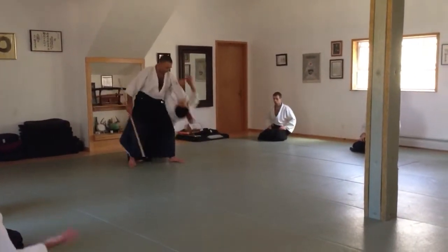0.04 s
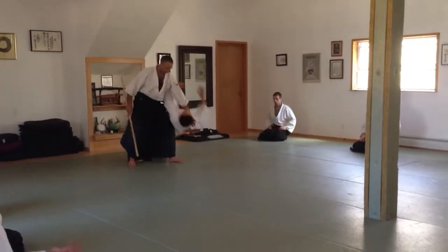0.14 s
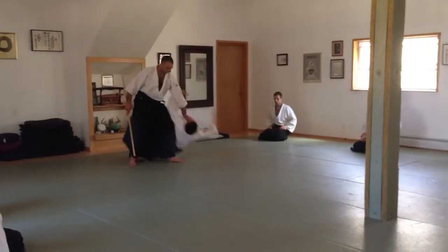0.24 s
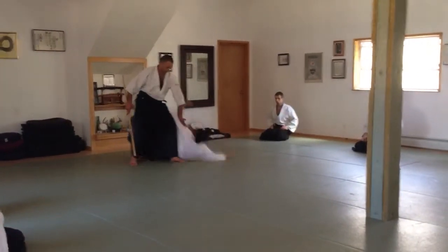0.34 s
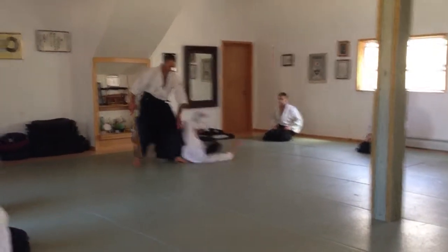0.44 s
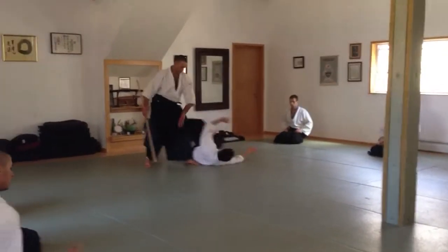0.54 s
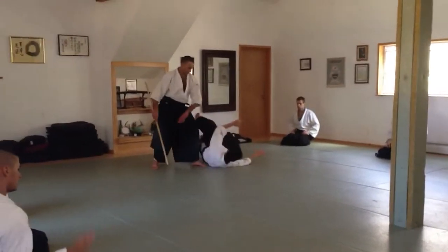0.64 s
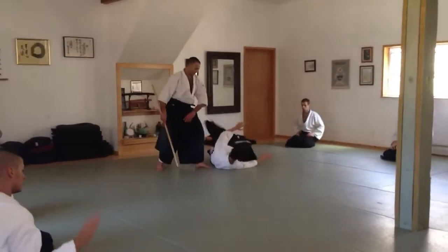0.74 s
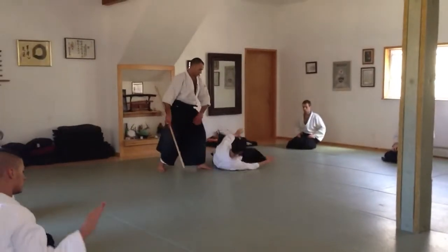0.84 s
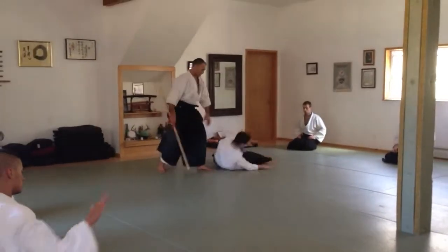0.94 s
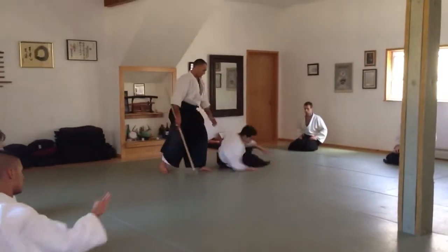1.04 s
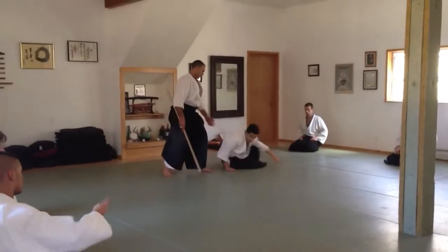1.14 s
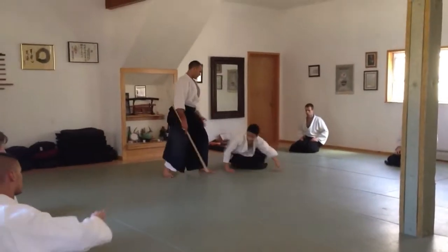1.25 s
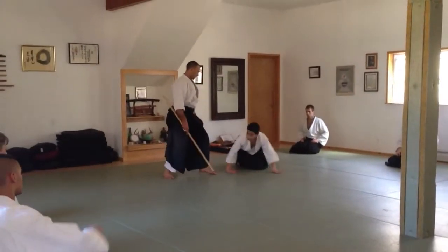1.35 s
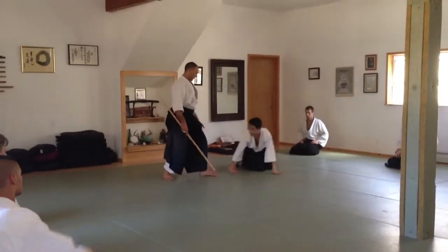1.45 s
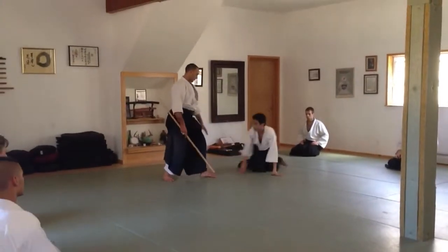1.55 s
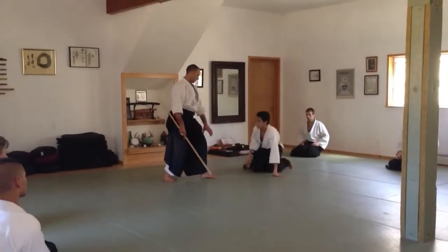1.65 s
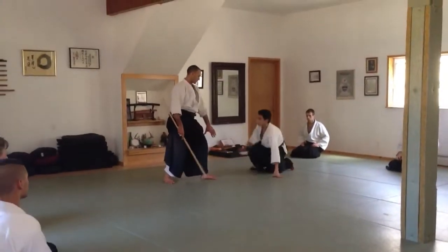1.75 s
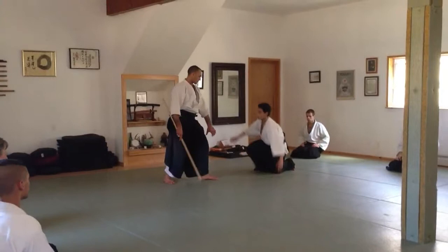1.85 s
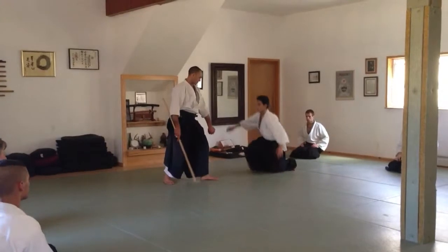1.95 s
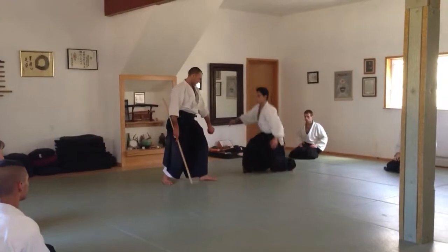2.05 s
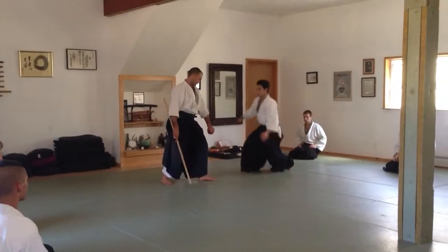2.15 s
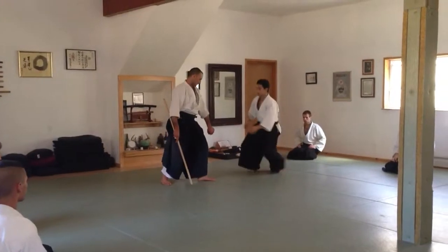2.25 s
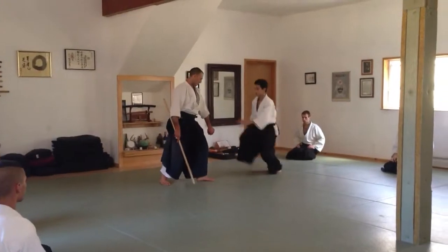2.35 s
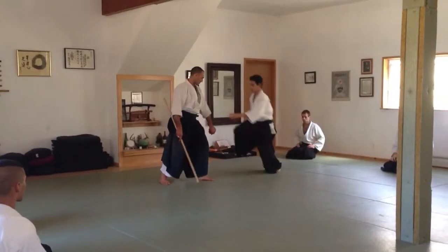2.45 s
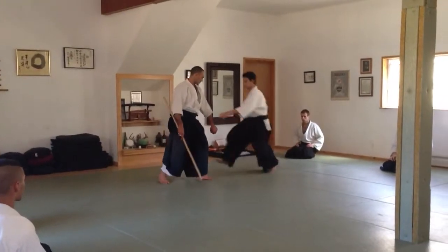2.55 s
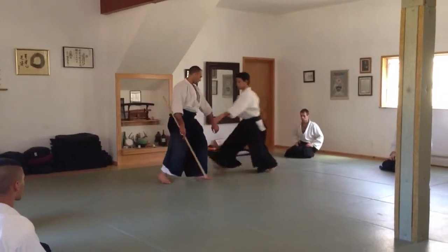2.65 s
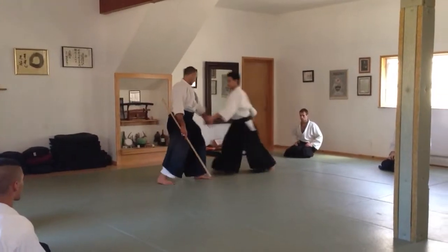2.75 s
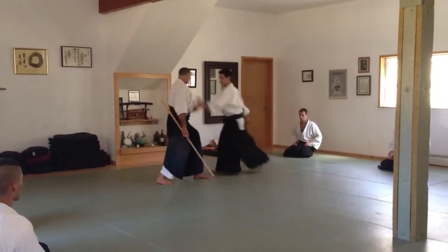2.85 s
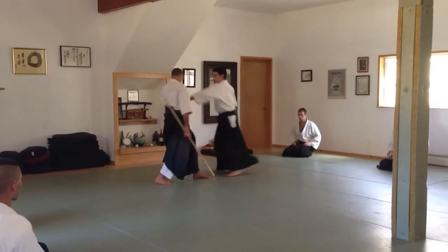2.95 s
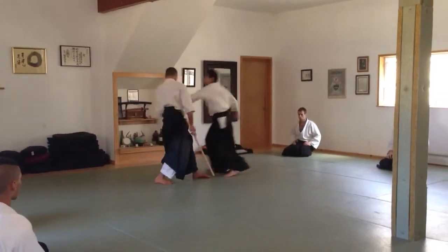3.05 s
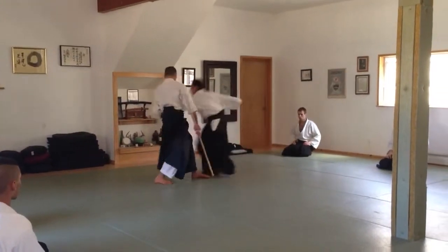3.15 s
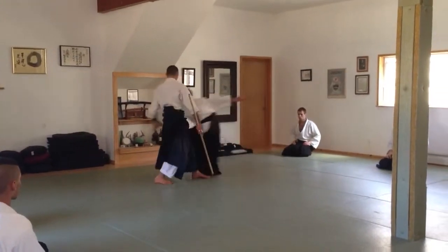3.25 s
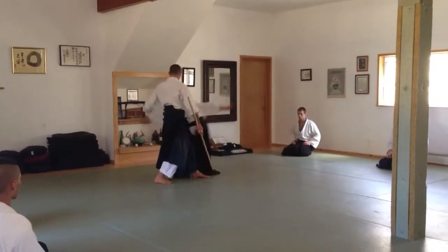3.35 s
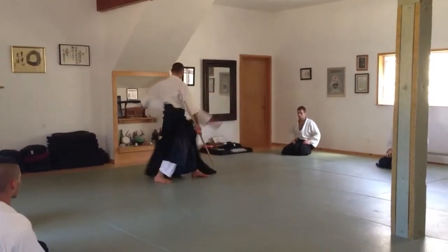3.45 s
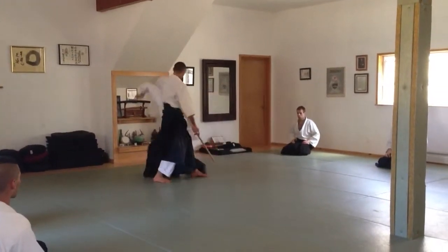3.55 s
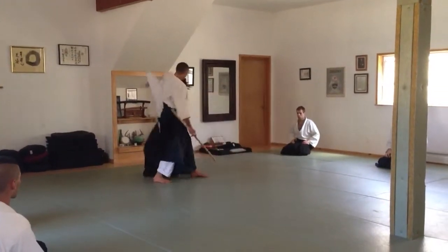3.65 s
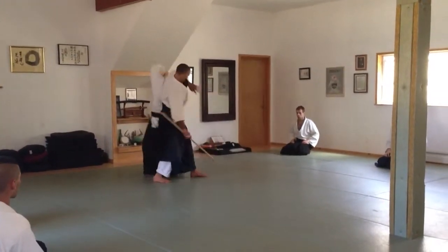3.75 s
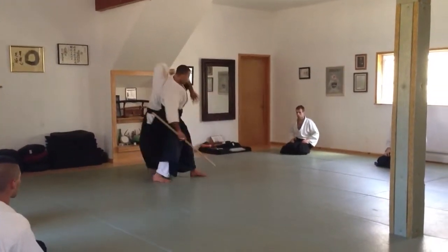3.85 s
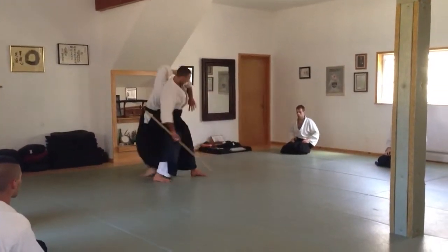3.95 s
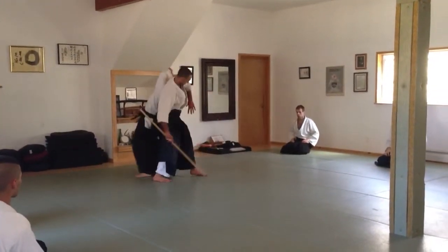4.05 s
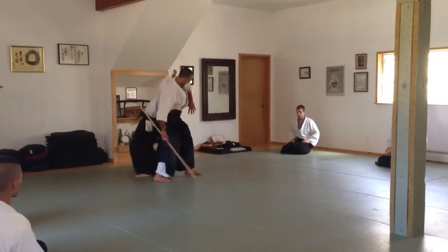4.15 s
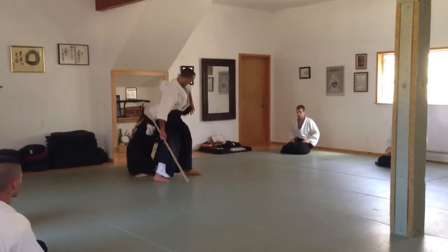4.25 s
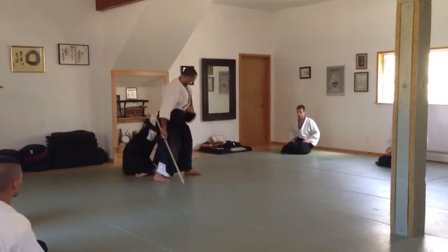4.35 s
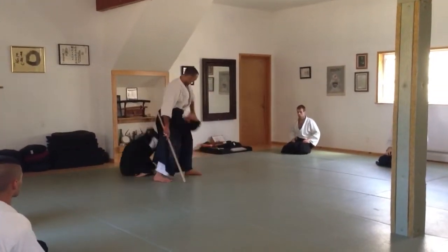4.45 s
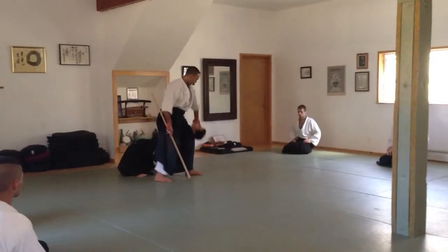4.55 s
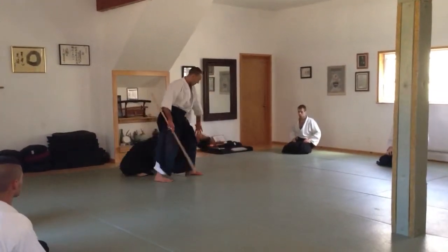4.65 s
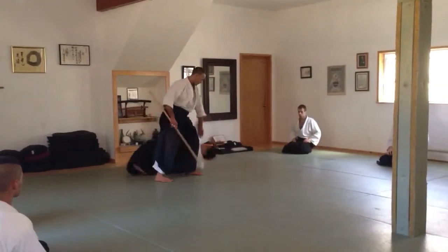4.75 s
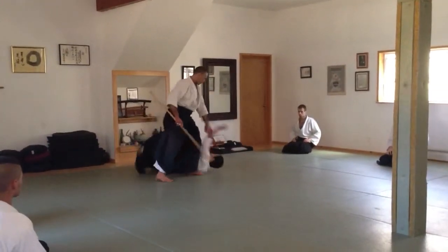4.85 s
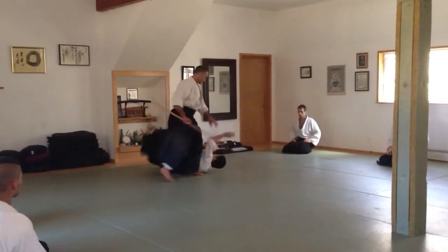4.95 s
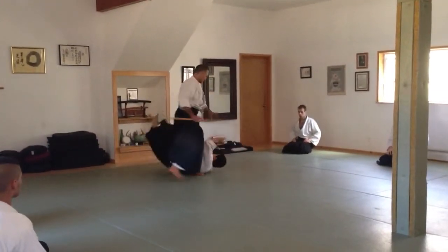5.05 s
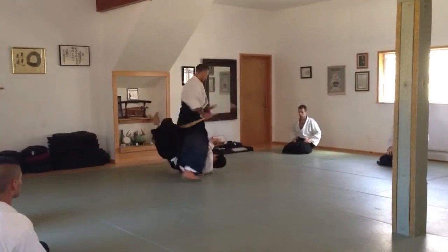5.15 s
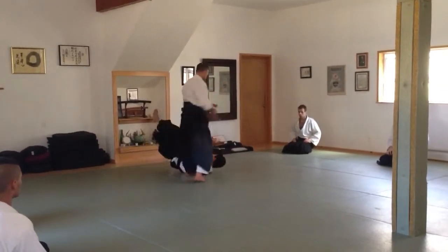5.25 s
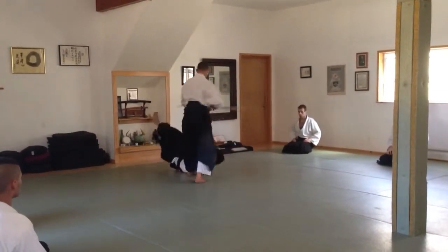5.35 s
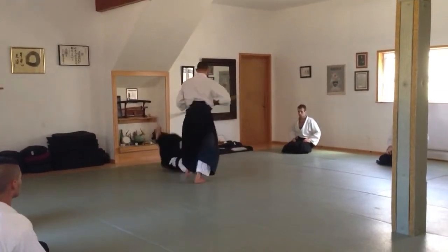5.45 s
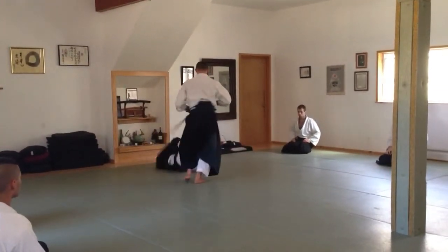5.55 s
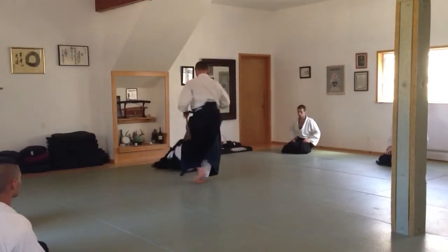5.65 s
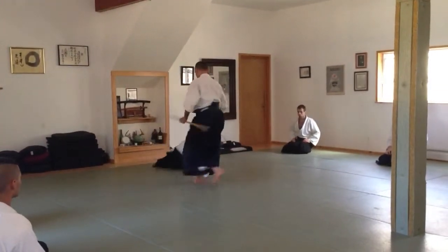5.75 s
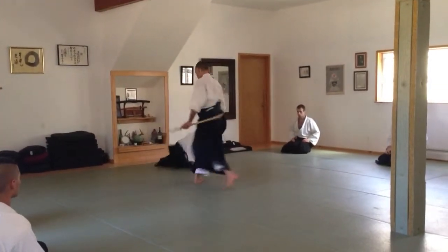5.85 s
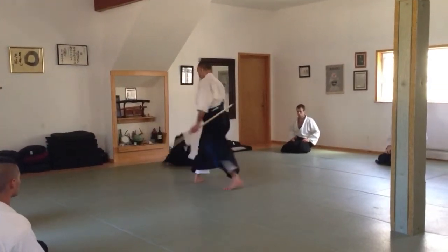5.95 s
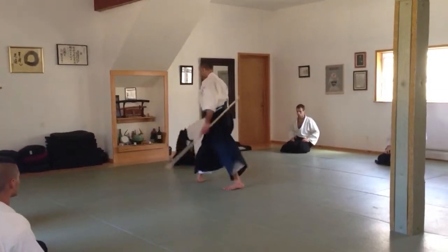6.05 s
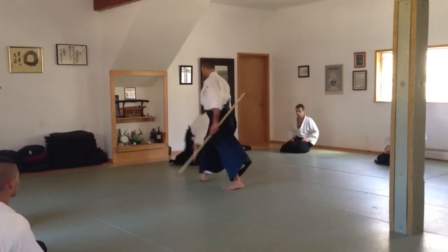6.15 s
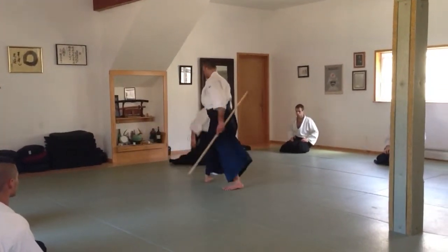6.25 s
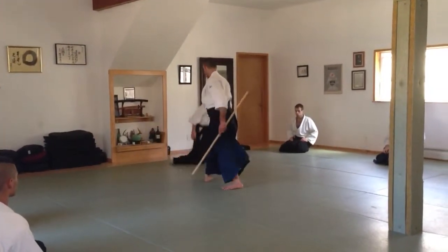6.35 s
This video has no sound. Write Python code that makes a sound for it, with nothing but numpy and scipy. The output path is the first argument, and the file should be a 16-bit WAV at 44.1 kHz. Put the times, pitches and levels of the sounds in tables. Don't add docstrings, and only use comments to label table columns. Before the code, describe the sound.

A bare, lively room heard from across the floor, with faint hiss and a low wavering motor hum throughout. Light barefoot scuffs at 0.1 s, then from about 0.42 to 0.6 s a body crashes onto the mat: tightly overlapping hollow booms, foam knocks and cracking slaps, the loudest event, with an echoing tail over half a second long. Around 1.15 to 1.3 s skin peels with tiny squeaks and a sole twists briefly. Soft pads and cotton rustles continue from 1.7 to 3.3 s. At 3.44 s a lighter fall lands with a bright rasping foot twist, and a wooden staff knocks several times until 3.75 s. Sliding scuffs follow at 3.8 and 4.06 s, with a firmer step at 4.3 s. A third hard fall hits at 4.84 s, thumping until about 5.07 s, and its tail fades. Quiet turning soles, cloth and soft steps run from 5.5 s to the end near 6.4 s.

```python
import sys
import numpy as np
from scipy import signal
from scipy.fft import rfft, irfft
from scipy.io import wavfile
from scipy.ndimage import uniform_filter1d

SR = 44100
rng = np.random.default_rng(int(sys.argv[2]) if len(sys.argv) > 2 else 0)


def ratio(d):
    e = np.asarray(d, float) / 20
    return 10 ** e


def to_wav(s):
    ch = np.atleast_2d(s).T
    pcm = np.round(np.clip(ch, -1, 1) * 32767)
    wavfile.write(sys.argv[1], SR, pcm.astype(np.int16))


N = 281799


def band(x, hz, width_hz, order=1):
    low_hz = np.sqrt(hz ** 2 + width_hz ** 2 / 4) - width_hz / 2
    high_hz = min(low_hz + width_hz, 0.48 * SR)
    sos = signal.butter(order, [low_hz, high_hz], "band", fs=SR, output="sos")
    return signal.sosfilt(sos, x)


def unit(x):
    return x / np.sqrt(np.mean(x ** 2))


def read(table, hz):
    table_hz, values = np.transpose(table)
    return np.interp(np.log(np.maximum(hz, 1)), np.log(table_hz), values)


def colour(x, table):
    gain_db = read(table, np.fft.rfftfreq(len(x), 1 / SR))
    return irfft(rfft(x) * ratio(gain_db), len(x))


def walk(rate_hz):
    k = int(SR / rate_hz)
    return unit(uniform_filter1d(uniform_filter1d(rng.standard_normal(N), k), k))


def lag(x, seconds):
    keep = np.exp(-1 / (seconds * SR))
    return signal.lfilter([1 - keep], [1, -keep], x)


# start in seconds, boom in dB, boom in Hz, knock in dB, slap in dB.
TRUNK = [(.417, -44, 310, -29.5, -59), (.427, -30.5, 200, -44, -42), (.462, -7, 335, -18, -21.5),
         (.470, -4.5, 223, -14, -16.5), (.552, -6, 230, -43, -57), (.584, -21, 220, -49, -37),
         (.65, -35, 302, -44, -42), (3.437, -22, 233, -25, -27.5), (3.449, -17.5, 208, -27, -17.5),
         (3.489, -18, 168, -34, -45), (3.525, -28, 213, -39, -56), (3.612, -35, 206, -59, -64),
         (4.828, -41.5, 298, -34, -42), (4.844, -3, 231, -11, -10.5), (4.853, -11, 267, -14.5, -28),
         (5.066, -19.5, 233, -38, -60)]
# start in seconds, boom in dB, boom in Hz, knock in dB, slap in dB.
LIMBS = [
    (.442, -25, 309.2, -19, -34.5),
    (.516, -23, 316, -22, -23.5),
    (.726, -51, 296, -58.5, -67),
    (3.44, -41, 230, -33, -47),
    (4.839, -14, 288, -12, -26.5),
    (4.946, -10.5, 214, -27.5, -32),
]
# start in seconds, boom in dB, boom in Hz, knock in dB, slap in dB.
HANDS = [
    (.4487, -23, 305, -28, -10.5),
    (.453, -3, 241, -13.5, -32),
    (.496, -8.5, 300, -24, -23.5),
    (3.455, -31, 225, -34.5, -45),
    (4.863, -6.5, 205, -15.5, -16),
    (4.894, -13, 180, -27, -21),
]


def landings():
    parts = [(TRUNK, 560), (LIMBS, 864), (HANDS, 1510)]
    rows = []
    for table, knock_hz in parts:
        for s, boom_db, boom_hz, knock_db, slap_db in table:
            rows.append((s, boom_db, boom_hz, knock_db, knock_hz, slap_db))
    return sorted(rows)


# start in seconds, boom in dB, boom in Hz, knock in dB, slap in dB.
STEPS = [(0.14, -54, 337, -56.5, -41), (1.256, -41, 189, -50, -40), (1.703, -53.5, 344, -67.5, -53),
         (2.34, -37.5, 172, -38.5, -58), (2.368, -40, 167, -50, -63), (2.418, -45, 261, -50.5, -73),
         (2.598, -40.5, 197, -46, -51), (2.629, -43, 295, -40, -58), (2.671, -41, 164, -73, -49),
         (2.791, -43, 355, -52, -48), (3.06, -49, 184, -45, -45), (3.098, -48, 219, -48.5, -67),
         (3.238, -40, 249, -47, -57), (3.278, -39, 158, -49, -67), (4.053, -53, 258, -66, -44.5),
         (4.141, -43.5, 184, -76, -56), (4.251, -46.5, 214, -53, -43.5), (4.305, -29, 181, -51, -42.5),
         (4.374, -37.5, 190, -49.5, -77), (4.64, -47, 192, -46.5, -56), (5.562, -48.5, 268, -56, -67),
         (5.81, -47, 206, -42.5, -48.5), (5.981, -45.5, 168.4, -55.5, -64), (6.332, -51.5, 224, -49, -44)]


def footfalls():
    knock_hz = 700
    return [(s, boom_db, boom_hz, knock_db, knock_hz, slap_db) for s, boom_db, boom_hz, knock_db, slap_db in STEPS]


# frequency in Hz, level in dB per Hz.
SLAP_SPECTRUM = [(800, -31.5), (1500, -2), (2300, -6.5), (2950, -1), (4100, -8.5), (6000, -12),
                 (9000, -16.5), (13000, -25), (16000, -51)]


def contacts(rows, boom_db, knock_db, slap_db, over, give, give_s, rise_s, ring_s, knock_s, slap_s):
    size = 4096
    out, t = np.zeros(N + size), np.arange(size) / SR
    for s, low_db, low_hz, mid_db, mid_hz, high_db in rows:
        noise = rng.standard_normal((2, size))
        boom = np.sin(2 * np.pi * low_hz * t) + over * np.sin(2 * np.pi * 1.3 * low_hz * t)
        boom *= (1 - np.exp(-t / rise_s)) * np.exp(-t / ring_s)
        boom += give * t / give_s * np.exp(1 - t / give_s)
        thump = unit(band(noise[0], mid_hz, 0.45 * mid_hz, order=2))
        knock = (1 - np.exp(-t / 0.0015)) * np.exp(-t / knock_s) * thump
        crack = unit(colour(noise[1], SLAP_SPECTRUM))
        slap = (1 - np.exp(-t / 0.00021)) * np.exp(-t / slap_s) * crack
        i = int(s * SR)
        out[i:i + size] += ratio(low_db + boom_db) * boom
        out[i:i + size] += ratio(mid_db + knock_db) * knock
        out[i:i + size] += ratio(high_db + slap_db) * slap
    return out[:N]


# start in seconds, peak in dB, frequency in Hz.
DROPS = [(0.467, -19.5, 101), (0.529, -48, 53.8), (0.739, -47, 96), (2.359, -40.5, 64.6),
         (2.719, -72, 80.7), (3.109, -45, 83.4), (3.456, -39, 92), (3.649, -53, 99), (4.139, -65.5, 88.8),
         (4.329, -46, 99.6), (4.868, -33, 102), (5.269, -78.5, 103)]


def joists():
    out, t = np.zeros(N), np.arange(N) / SR
    for s, db, hz in DROPS:
        age = np.maximum(t - s, 0)
        swing = age / 0.024 * np.exp(1 - age / 0.0096)
        out += ratio(db + 6) * swing * np.sin(2 * np.pi * hz * age)
    return out


def rings(rows):
    size = 8192
    out, t = np.zeros(N + size), np.arange(size) / SR
    for s, db, hz, length_s in rows:
        rough = unit(band(rng.standard_normal(size), hz, 0.09 * hz, order=2))
        envelope = (1 - np.exp(-t / 0.0018)) * np.exp(-t / length_s)
        i = int(s * SR)
        out[i:i + size] += ratio(db) * envelope * (np.sin(2 * np.pi * hz * t) + 0.34 * rough)
    return out[:N]


# start in seconds, level in dB, frequency in Hz, length in seconds.
STAFF = [
    (3.441, -37, 617, 0.027),
    (3.492, -31, 602, 0.025),
    (3.522, -32, 616, .025),
    (3.61, -34, 639, 0.015),
    (3.735, -45, 620, 0.0097),
]


def staff():
    return rings(STAFF)


# start in seconds, level in dB, frequency in Hz, length in seconds.
PEELS = [
    (1.158, -49, 2045, 0.0089),
    (1.256, -45.5, 4680, 0.0069),
]


def peels():
    return rings(PEELS)


def swell(t, s, rise_s, fall_s, db):
    return ratio(db - 16 * np.maximum((s - t) / rise_s, (t - s) / fall_s))


# time in seconds, level in dB.
EFFORT = [(0, -55.5), (.36, -58.5), (1.0, -74), (1.25, -64), (1.48, -68), (1.77, -60.5), (1.96, -72),
          (2.2, -61.5), (2.54, -67.5), (2.63, -57), (2.95, -63.5), (3.26, -58), (3.95, -65.5),
          (4.55, -60.5), (5.5, -66.5), (5.78, -59.5), (6.25, -73.5), (6.39, -50)]


def body_effort(t):
    return ratio(np.interp(t, *np.transpose(EFFORT)))


# peak in seconds, rise in seconds, fall in seconds, level in dB, brightness in dB.
SLIDES = [(.04, 0.016, 0.6, -69, 0.5), (.15, 0.022, 0.074, -62, 3), (0.191, 0.057, 0.095, -61.5, -7.5),
          (1.16, 0.051, 0.09, -66, 2.5), (1.52, .04, 0.083, -72, -1), (1.72, 0.18, 0.56, -72, 1),
          (2.34, 0.044, 0.16, -76, 10), (2.63, 0.071, 0.22, -68, -4), (2.81, 0.03, 0.052, -63, 1),
          (3.069, 0.021, 0.051, -53.5, 0), (3.26, 0.28, 0.21, -64, -3), (3.808, 0.12, 0.16, -55.5, -4),
          (4.063, 0.021, 0.11, -49.5, -3.5), (4.198, .02, 0.088, -68.5, -10.5),
          (4.304, 0.059, 0.21, -61, -1), (6.2, 0.11, 0.063, -74, 3.5), (6.314, 0.078, 0.053, -57.5, -2)]
# peak in seconds, rise in seconds, fall in seconds, level in dB, centre in Hz.
TWISTS = [
    (1.259, 0.064, 0.035, -49, 4660),
    (1.32, 0.025, 0.13, -66.5, 4910),
    (3.455, 0.011, 0.11, -39.5, 5600),
    (5.87, 0.053, 0.185, -61.5, 5520),
]


def sole_gains(t, effort):
    sole_db, sole_bright_db, twist_bright_db, slide_hz = -9.5, -4.5, -48, 4870
    slides = [(swell(t, s, rise, fall, db), bright_db) for s, rise, fall, db, bright_db in SLIDES]
    twists = [(swell(t, s, rise, fall, db), hz) for s, rise, fall, db, hz in TWISTS]
    free = ratio(sole_db) * effort + sum(g for g, _ in slides)
    held = sum(g for g, _ in twists)
    rub = free + held
    shine = ratio(sole_db + sole_bright_db) * effort
    shine = shine + sum(g * ratio(db) for g, db in slides) + ratio(twist_bright_db) * held
    centre_hz = (free * slide_hz + sum(g * hz for g, hz in twists)) / rub
    return rub, shine, centre_hz


def grains(rate_hz, spread_db):
    hits = rng.random(N) < rate_hz / SR
    sizes = ratio(spread_db * np.minimum(rng.exponential(size=N), 5))
    return unit(rng.standard_normal(N) * (0.76 + hits * sizes))


WEAVE_HZ = 3300 * 1.15 ** np.arange(7)


def soles(rub, shine, centre_hz):
    scrape = grains(4100, 2.2)
    peak = 0
    for hz in WEAVE_HZ:
        share = np.exp(-(np.log(centre_hz / hz) / 0.092) ** 2)
        peak = peak + share * band(scrape, hz, hz / 6)
    focus = np.clip(-20 * np.log10(shine / rub) / 14, 0.1, 1)
    broad = unit(band(scrape, 6000, 6000, order=2))
    scuff = 1.8 * focus * unit(peak) + (1.2 - 0.59 * focus) * broad
    bright = unit(band(scrape, 10500, 8000, order=2))
    return ratio(-4.5) * (rub * scuff + shine * bright)


def cotton(effort, rub):
    cloth_db, dragged_db = -4, -17
    rasp = unit(band(grains(3000, 4.1), 1300, 1400, order=2))
    return (ratio(cloth_db) * effort + ratio(dragged_db) * rub) * rasp


def boards(t, effort):
    board_db, stir_db, stir_s = -3.5, -9, 0.13
    planks = unit(band(rng.standard_normal(N), 240, 350, order=2))
    frame = unit(band(rng.standard_normal(N), 73, 80, order=2))
    shuffle = ratio(1.07 * walk(28)) * (planks + 0.25 * frame)
    stir = 0
    for s, _, _, knock_db, _ in STEPS:
        stir = stir + (t > s) * ratio(knock_db + stir_db) * np.exp(-np.abs(t - s) / stir_s)
    return (ratio(board_db) * effort + stir) * ratio(-4) * shuffle


def moves():
    t = np.arange(N) / SR
    effort = body_effort(t)
    rub, shine, centre_hz = sole_gains(t, effort)
    return soles(rub, shine, centre_hz) + cotton(effort, rub) + boards(t, effort)


# frequency in Hz, level in dB, T60 in seconds.
ROOM_MODES = [(167, -19, 0.2), (188, -17, 0.74), (217.4, -11, 0.41), (249, -12, 0.4), (283, -14, 0.22),
              (327.7, -6.5, 0.53), (376, -21.5, 0.87), (447, -19, 0.31), (622, -11.5, 0.5),
              (655, -12, 0.15)]


def standing(x):
    out = 0
    for hz, db, t60_s in ROOM_MODES:
        keep = np.exp(-np.log(1000) / (t60_s * SR))
        ring = signal.lfilter([1, 0, -1], [1, -2 * keep * np.cos(2 * np.pi * hz / SR), keep ** 2], x)
        out = out + ratio(db - 48) * ring
    return out


# frequency in Hz, width in Hz, level in dB, T60 in seconds.
LINGER = [(1477, 153, -7.5, 1.0), (2030, 250, -3.5, 0.87), (2500, 162, -4.5, 0.75), (3840, 170, -5, 0.63)]


def flutter(x):
    out = 0
    for hz, width_hz, db, t60_s in LINGER:
        stored = lag(band(x, hz, width_hz) ** 2, t60_s / np.log(1e6))
        field = unit(band(rng.standard_normal(N), hz, width_hz, order=2))
        out = out + ratio(db) * np.sqrt(stored) * field
    return out


# frequency in Hz, T60 in seconds.
ROOM_T60 = [(50, 0.15), (120, 0.13), (200, 0.78), (500, 0.62), (1450, 0.8), (2900, 0.65), (3700, 0.68),
            (6000, 0.6), (9000, 0.46), (14000, .26)]
# frequency in Hz, level in dB.
ROOM_COLOUR = [(50, -15), (120, -4), (250, -1.5), (600, 1.5), (1000, -2.5), (1450, -1.5), (2300, 1.5),
               (2900, 4.5), (3700, 3.5), (6000, 2.5), (14000, -7)]
# delay in seconds, level in dB.
ECHOES = [
    (.0043, -4.5),
    (0.011, -4),
    (0.0174, -8),
    (.0236, -11.5),
]


def room(x):
    room_db, rise_s = 3, 0.0017
    out, noise = x.copy(), rng.standard_normal(N)
    for s, db in ECHOES:
        delay = int(s * SR)
        out[delay:] += ratio(db) * x[:-delay]
    for hz in 45 * 2 ** np.arange(0, 8.5, 1 / 3):
        power = band(x, hz, hz / 4.3, order=2) ** 2
        stored = lag(lag(power, rise_s), read(ROOM_T60, hz) / np.log(1e6))
        noise = np.roll(noise, N // 29)
        field = unit(band(noise, hz, hz / 4.3, order=2))
        out += ratio(room_db + read(ROOM_COLOUR, hz)) * np.sqrt(stored) * field
    return out + standing(x) + flutter(x)


# frequency in Hz, level in dB per Hz.
AIR = [(18, -48), (30, -19.5), (92, -4.5), (113, -3), (167, 1.5), (426, -3.5), (538, -1.5), (837, -11.5),
       (1560, -12.5), (2490, -15.5), (4310, -16), (7430, -22), (15000, -27)]
# frequency in Hz, level in dB.
HUM = [(118.4, -65.5), (177.6, -85)]


def air():
    t = np.arange(N) / SR
    hiss_db = -61 + 0.4 * walk(1)
    out = ratio(hiss_db) * unit(colour(rng.standard_normal(N), AIR))
    for hz, db in HUM:
        out += ratio(db + 2 * walk(4.3)) * np.sin(2 * np.pi * hz * t + walk(1.9))
    return out


# frequency in Hz, level in dB.
TINT = [(1150, -1.5), (1480, 2), (1900, 0), (2650, 1.5), (3050, -7), (3450, 0), (3900, 2), (5500, 0)]


def scene():
    falls = contacts(landings(), boom_db=-3.5, knock_db=0.5, slap_db=-3.5, over=0.38, give=0.14, give_s=0.0015,
                     rise_s=0.00079, ring_s=0.0079, knock_s=0.0074, slap_s=0.0031)
    steps = contacts(footfalls(), boom_db=-2, knock_db=-11.5, slap_db=-5, over=0.054, give=0.08, give_s=0.004,
                     rise_s=0.0019, ring_s=0.0099, knock_s=0.0085, slap_s=0.0024)
    on_mat = colour(room(falls + steps + peels()), TINT)
    return (on_mat + staff() + joists() + moves() + air())[None]


def low_pass(x):
    return signal.sosfilt(signal.butter(12, 16150, fs=SR, output="sos"), x)


def record(dry):
    ceiling, knee, top_hz = 0.78, 6, 15300
    x = signal.sosfilt(signal.butter(1, 140, "high", fs=SR, output="sos"), dry)
    x = x / (1 + np.abs(x / ceiling) ** knee) ** (1 / knee)
    x = signal.sosfilt(signal.ellip(8, 0.2, 60, top_hz, fs=SR, output="sos"), x)
    return low_pass(x)


dry = scene()
out = record(dry)
to_wav(out)
```